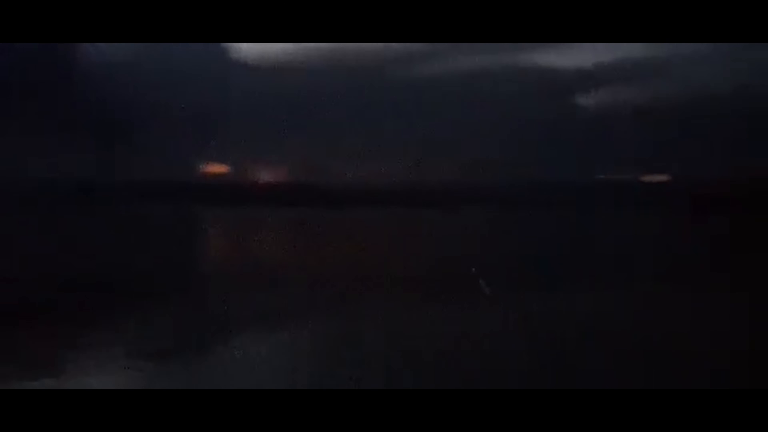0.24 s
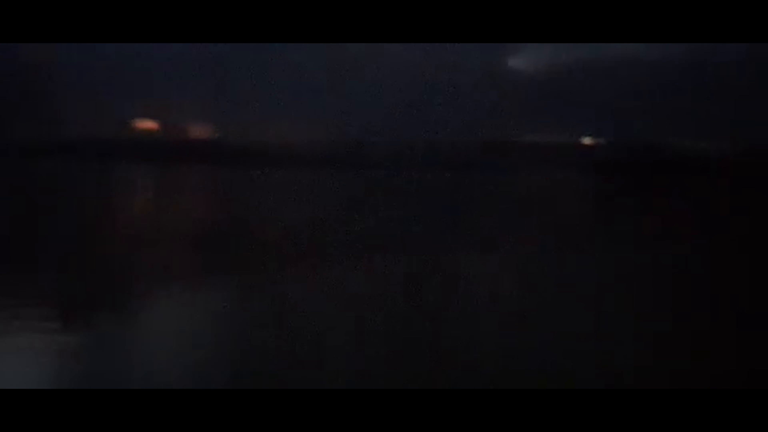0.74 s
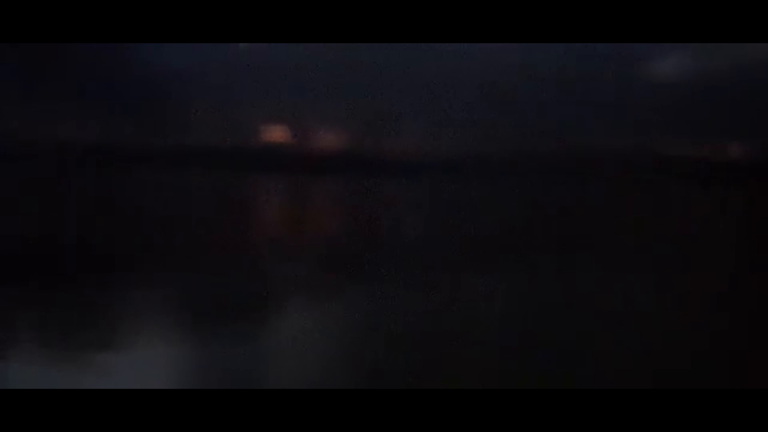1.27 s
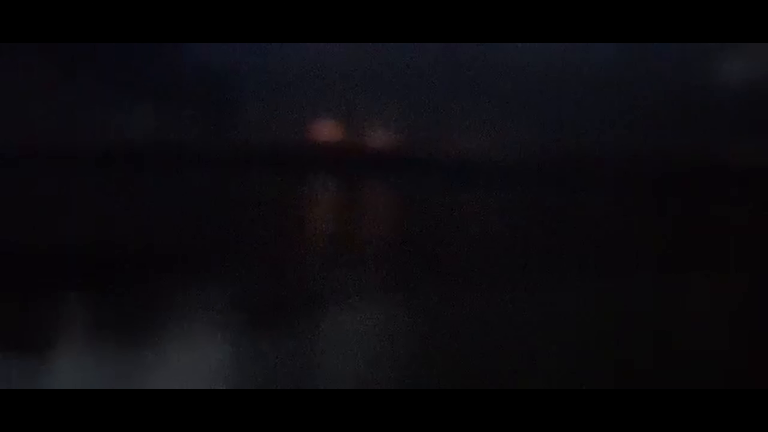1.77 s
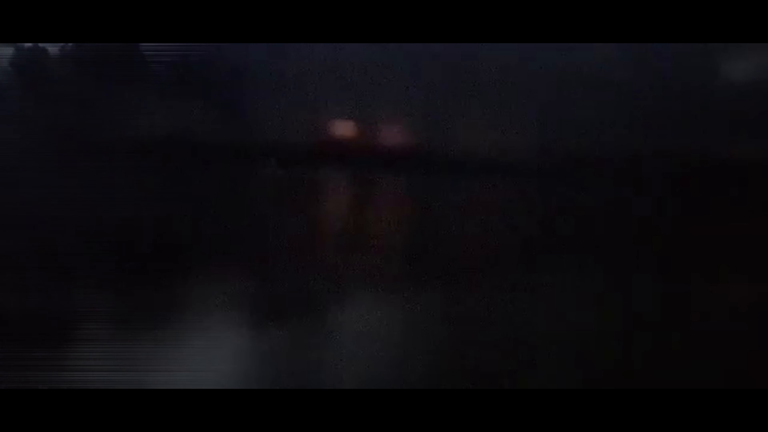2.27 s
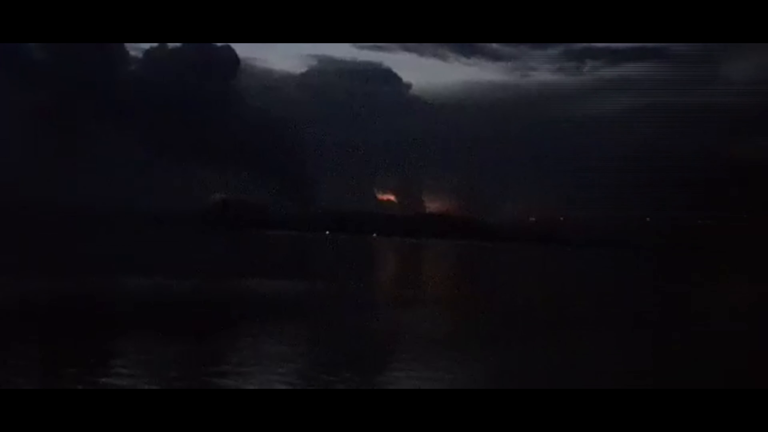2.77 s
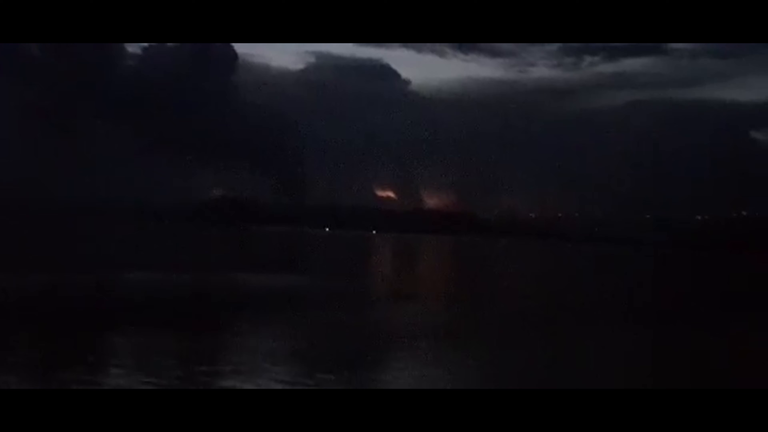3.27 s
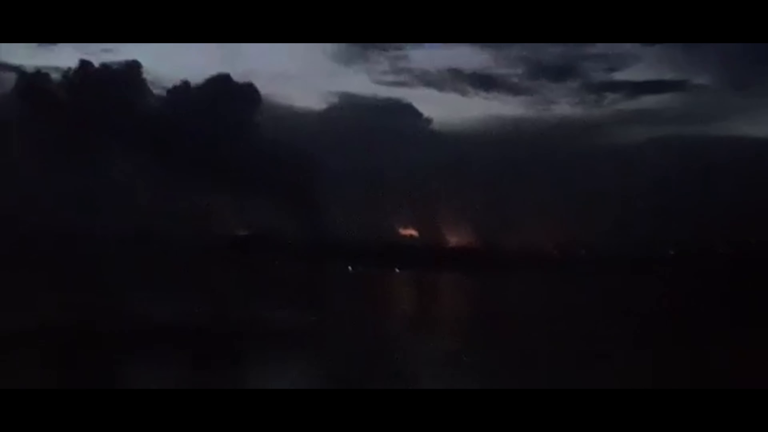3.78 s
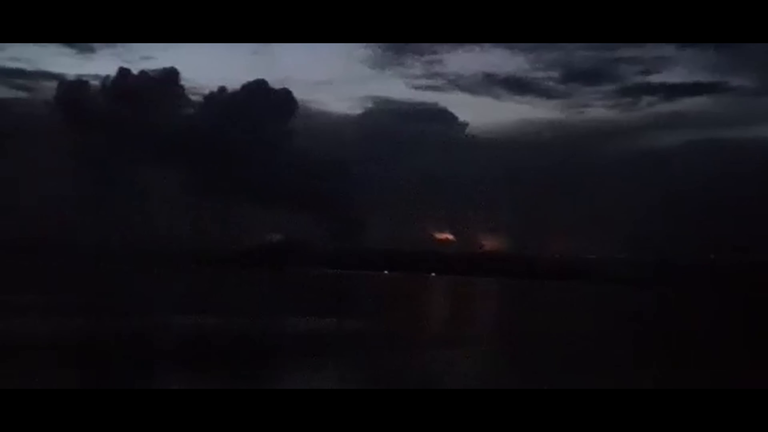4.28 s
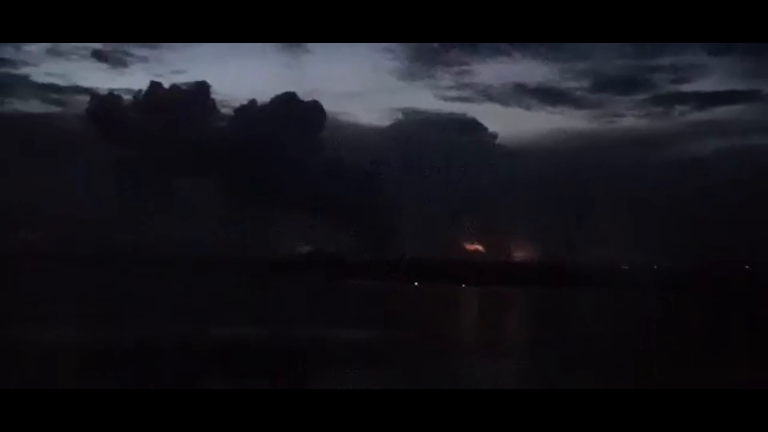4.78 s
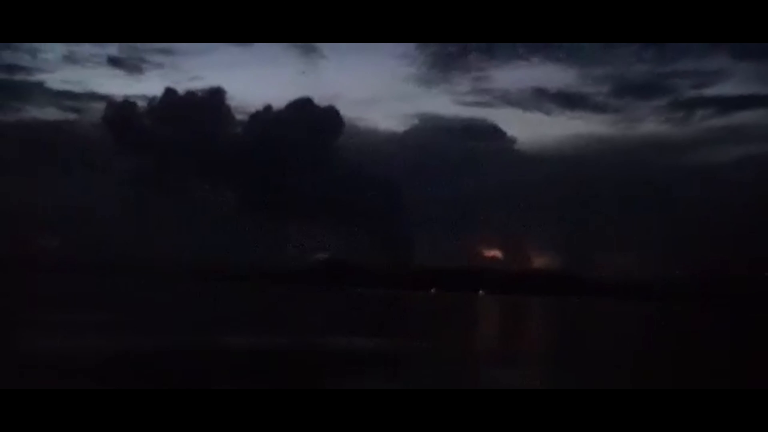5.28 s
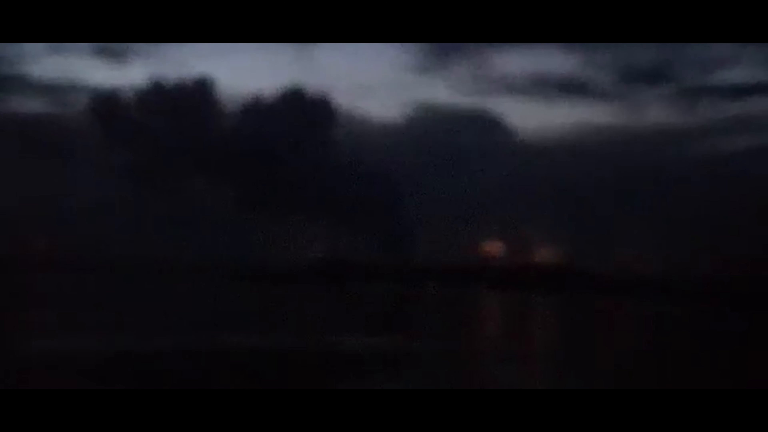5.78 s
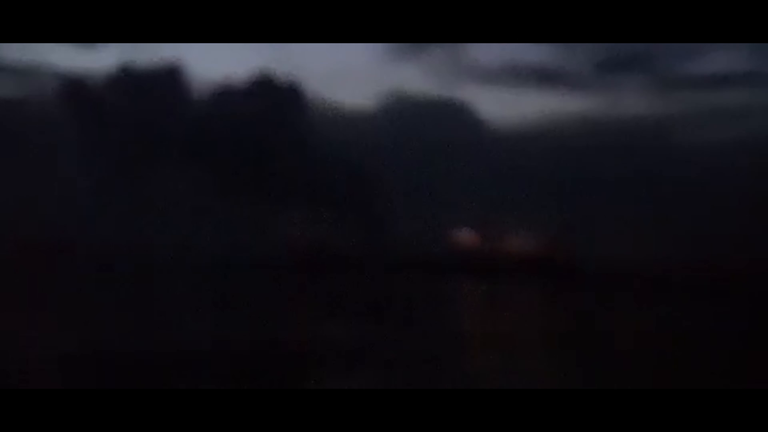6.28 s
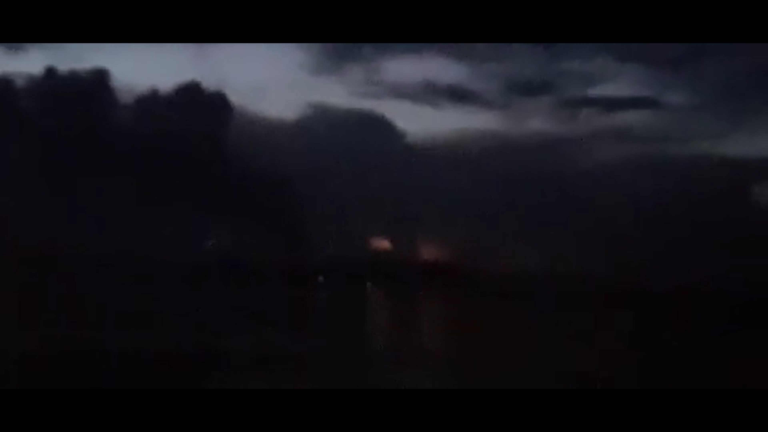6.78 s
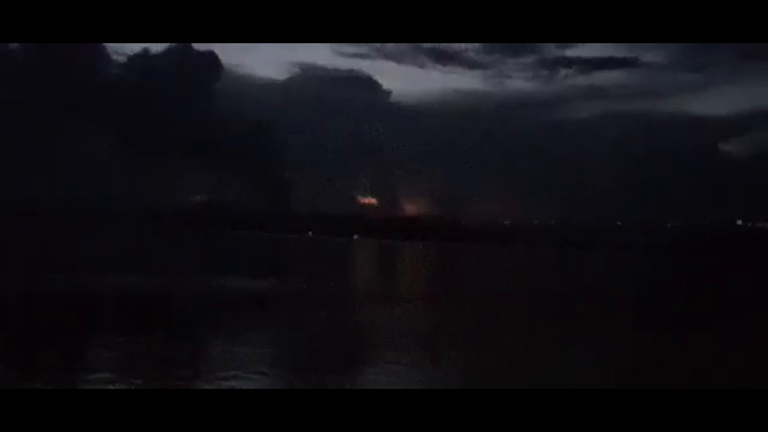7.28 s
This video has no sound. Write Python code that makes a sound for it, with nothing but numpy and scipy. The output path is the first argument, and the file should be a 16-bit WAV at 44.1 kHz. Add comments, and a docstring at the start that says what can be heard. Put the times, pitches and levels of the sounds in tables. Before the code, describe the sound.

A cricket chirps quick falling triplets at right on a night shore; a hollow knock, a brief sound dropout, then a loud nearby unbroken trill.

```python
"""Night at the edge of a lake: shore rumble, a murmur over the water with a distant boat, a far chorus. A
cricket to the right chirps falling triplets from the start. Cloth rustles, then something hollow knocks and
rattles with a faint scrape; small ticks and far frogs follow, made of short noise bands. At two seconds a noise
burst overloads the right channel, the sound drops out for a moment and comes back with a click. After three
seconds a nearer cricket starts a loud unbroken trill of scraped wing strokes, with hoarse swells around the
chirps."""
import sys
import numpy as np
from scipy import signal
from scipy.fft import rfft, irfft, next_fast_len
from scipy.io import wavfile
from scipy.ndimage import uniform_filter1d

SR = 44100
rng = np.random.default_rng(int(sys.argv[2]) if len(sys.argv) > 2 else 0)


def log_audio(samples):
    """Write samples as a 16-bit WAV file to the path given in sys.argv[1]."""
    # one column per channel
    frames = np.atleast_2d(samples).T
    # limit to full scale, then quantise
    limited = np.clip(frames, -1, 1)
    pcm = np.round(limited * 32767).astype(np.int16)
    wavfile.write(sys.argv[1], SR, pcm)


N = 332073


def amp(db):
    """Amplitude factor for a level in dB."""
    return 10 ** (np.asarray(db) / 20)


def unit(x):
    """Scales a signal to an RMS of one."""
    return x / np.sqrt(np.mean(x ** 2) + 1e-20)


def curves(rows):
    """The columns of a table after its time column, joined by lines at every sample."""
    s, *columns = np.transpose(rows)
    return [np.interp(np.arange(N) / SR, s, column) for column in columns]


def pan(left_db):
    """Two channel gains of constant power; negative places the sound to the right."""
    gains = amp(np.array([[.5], [-.5]]) * left_db)
    return gains / np.sqrt((gains ** 2).mean(0))


def add(mix, s, sound):
    """Lays a sound into the mix at s seconds."""
    part = mix[:, max(round(s * SR), 0):][:, :sound.shape[-1]]
    part += sound[..., :part.shape[1]]


def noise(spectrum, same=0):
    """Stereo noise of a given spectrum, silent above its last point; same = likeness of the channels."""
    hz, db = np.transpose(spectrum)
    gain = amp(np.interp(np.log(np.fft.rfftfreq(N, 1 / SR) + 1), np.log(hz), db, right=-np.inf))
    a, b = irfft(rfft(rng.standard_normal((2, N))) * gain, N)
    same = np.clip(same, -1, 1)
    return unit(np.array([a, same * a + np.sqrt(1 - same ** 2) * b]))


def band(centre_hz, width_hz, order=2):
    """Stereo noise in one band; a higher order gives steeper sides."""
    off = (np.fft.rfftfreq(N, 1 / SR) - centre_hz) / (width_hz / 2)
    return unit(irfft(rfft(rng.standard_normal((2, N))) / (1 + abs(off) ** order), N))


def drift(hz):
    """Two random curves that wander mostly slower than hz."""
    return band(0, 2 * hz, order=4)


def patchy(x, depth_db, patch_hz, patch_s):
    """Lets a sound swell and sink in small patches of pitch and time."""
    z = signal.stft(x, nperseg=512, noverlap=384)[2]
    field = rng.standard_normal(z.shape[:0:-1]).T
    for axis, span in [(0, patch_hz * 512 / SR), (1, patch_s * SR / 128)] * 2:
        field = uniform_filter1d(field, max(round(span), 1), axis)
    gain = unit(amp(depth_db * np.minimum(unit(field), 2)))
    return signal.istft(z * gain, nperseg=512, noverlap=384)[1][:, :N]


def swells(rows, width_hz, ragged_db):
    """Soft hoarse swells of band noise, one a row."""
    out = np.zeros((2, N))
    for s, length, hz, db in rows:
        swell = np.hanning(int(length * SR))
        add(out, s, amp(db) * swell * band(hz, width_hz, order=3)[:, :len(swell)])
    return out * amp(ragged_db * drift(86)[0])


# spectrum of the low air and far hum of the shore: [f/Hz, relative level/dB]
RUMBLE_SPECTRUM = [(20, -31.5), (40, -7.5), (60, -0.5), (90, 6.5), (120, 3), (170, -5.5), (300, -11),
                   (500, -44.5), (1000, -33.5)]
# course of the low rumble: [t/s, level/dB]
RUMBLE_COURSE = [(0, -49), (.8, -53), (1.9, -55.5), (3.6, -51), (7.5, -51.5)]


def rumble(lump_db=1.0):
    """Low air along the shore, nearly alike at both microphones: lumpy low noise."""
    level_db = curves(RUMBLE_COURSE)[0] + lump_db * drift(8.0)[0]
    return amp(level_db) * noise(RUMBLE_SPECTRUM, same=0.84) * pan(-1.5)


# colour of the murmur across the water, and of the engine within it: [f/Hz, relative level/dB]
MURMUR_SPECTRUM = [(100, -15.5), (220, -14), (310, 2), (390, -4.5), (440, -1), (500, -12), (570, -10.5),
                   (800, -20.5), (1250, -35.5), (1600, -32), (2100, -32.5), (2700, -32.5), (4000, -35.5),
                   (6000, -46.5)]


def engine(firing_hz=37, waver_turns=0.023):
    """A far boat engine: overtones of its firing beat, coloured like the rest of the murmur."""
    turns = firing_hz * np.arange(N) / SR + waver_turns * drift(1.0)[0]
    hz, db = np.transpose(MURMUR_SPECTRUM)
    orders = np.arange(6, 19)
    gains = amp(np.interp(np.log(orders * firing_hz), np.log(hz), db))
    return unit(sum(g * np.cos(2 * np.pi * (k * turns + rng.random())) for k, g in zip(orders, gains)))


# course of the murmur across the water: [t/s, level/dB]
MURMUR_COURSE = [(0, -66), (1.9, -70.5), (2.3, -58), (5.5, -56), (7.5, -54.5)]


def murmur(throb_hz=23.0, throb_db=4.0, engine_db=-9.5):
    """Far boats across the water: patchy noise that throbs, with one engine's steady overtones."""
    throb_phase = 2 * np.pi * throb_hz * np.arange(N) / SR + drift(2.4)[0]
    throb = amp(throb_db * np.sin(throb_phase) - 2.3)
    patchy_noise = patchy(noise(MURMUR_SPECTRUM, same=0.14), depth_db=3, patch_hz=400, patch_s=.1)
    level_db = curves(MURMUR_COURSE)[0] + 1.0 * drift(14)[0]
    return amp(level_db) * (throb * patchy_noise + amp(engine_db) * engine()) * pan(-0.67)


# spectrum of the faint hiss: [f/Hz, relative level/dB]
HISS_SPECTRUM = [(1000, 5.5), (2800, 0), (6500, -2), (8500, -0.5), (11000, 3), (12900, -4.5), (13400, -31)]


def hiss(level_db=-70.5):
    """A trace of broad hiss that swells and sinks in patches."""
    return patchy(amp(level_db) * noise(HISS_SPECTRUM), depth_db=5, patch_hz=350, patch_s=.1)


# far choirs of frogs and insects: [low edge f/Hz, high edge f/Hz, level/dB, left-right/dB, slow swell/dB]
FAR_CHOIRS = [(1250, 2700, -83, 0, -4.5), (1850, 2250, -81, -2, 3), (4496, 5365, -53, -5.5, 0),
              (7110, 7600, -70.5, -2.5, 2.5), (9750, 11100, -74, -12.5, 2)]


def chorus(throb_db=1.8, whistle_db=-72):
    """Countless far callers merge into throbbing noise bands; a thin high one stands out now and then."""
    out = np.zeros((2, N))
    for low_hz, high_hz, db, left_db, swell_db in FAR_CHOIRS:
        level_db = db + throb_db * drift(21)[0] + swell_db * drift(2.8)[0]
        callers = band((low_hz + high_hz) / 2, high_hz - low_hz, order=6)
        out += amp(level_db) * pan(left_db) * callers
    out = patchy(out, depth_db=2.0, patch_hz=200, patch_s=.08)
    bouts = np.maximum(drift(11.0)[0] - .5, 0)
    return out + amp(whistle_db) * bouts * band(7460, 70)


def bank(x, wet_db, t60):
    """Grass and shore scatter a short tail, different at each microphone."""
    t = np.arange(SR // 4) / SR
    tail = rng.standard_normal((2, len(t))) * amp(-60 * t / t60) * (t > .003)
    return x + amp(wet_db) * signal.fftconvolve(x, unit(tail) / np.sqrt(len(t)), axes=1)[:, :N]


# triplet chirps, about four a second with a stumble now and then: [t/s, level/dB, roughness/0-1]
TRIPLETS = [(0.04, -34.5, 0.13), (.278, -42, 0.07), (.626, -42, 0.11), (.868, -38.5, 0.08),
            (1.111, -37.5, 0.05), (1.350, -36.5, 0.07), (1.556, -36.5, 0.08), (1.797, -35, 0.03),
            (2.331, -32, 0.02), (2.570, -33.5, 0.05), (2.809, -34, 0.22), (3.049, -36, 0.08),
            (3.2913, -37, 0.6), (3.531, -35, 0.46), (3.7711, -39.5, 0.6), (4.013, -38.5, 0.84),
            (4.25, -37, 1), (4.4912, -33, 0.5), (4.7315, -34, 0.35), (4.935, -37.5, .75),
            (5.175, -33.5, 0.34), (5.444, -35, 0.3), (5.683, -38, 0.9), (5.9242, -33, 0),
            (6.1624, -36.5, 0.4), (6.4044, -37, 0.3), (6.69, -35.5, 0.3), (6.956, -33.5, 0.5),
            (7.1951, -34.5, 0.4), (7.4352, -37.5, 0.37)]


def chirps(start_hz=5590, blur_hz=330, left_db=-15, smear_hz=5230, smear_width_hz=850, smear_db=-5):
    """Three wing strokes a chirp, sliding down in pitch; rough ones break up and smear into a noisy band."""
    fall_hz, pulse_s, spacing_s, smear_s = 1100, .0205, .0324, .05
    out, smear, t = np.zeros((2, N)), np.zeros((2, N)), np.arange(0, pulse_s, 1 / SR)
    u = t / pulse_s
    arch = np.sin(np.pi * u) ** 2
    shape = arch / (.3 + .7 * arch)
    grit = (drift(blur_hz)[0] + 1j * drift(blur_hz)[0]) / np.sqrt(2)
    smear_swell = np.hanning(round(smear_s * SR))
    for s, db, rough in TRIPLETS:
        rough = np.clip(rough, 0, 1)
        for k, (detune, loud, late) in enumerate(rng.standard_normal((3, 3))):
            at = s + k * spacing_s + 0.0003 * late
            phase = 2 * np.pi * np.cumsum(start_hz + 28 * detune - fall_hz * u) / SR
            stroke_grit = grit.take(round(at * SR) + np.arange(len(t)), mode="clip")
            grip = np.sqrt(1 - rough) + np.sqrt(rough) * stroke_grit
            add(out, at, amp(db + .6 * loud) * shape * (grip * np.exp(1j * phase)).imag)
            # the smear is centred on its stroke
            add(smear, at + (pulse_s - smear_s) / 2, rough * amp(db + smear_db) * smear_swell)
    smeared = smear * pan(-9) * band(smear_hz, smear_width_hz, order=6)
    return bank(out * pan(left_db), wet_db=-10, t60=0.18) + smeared


def brush(start, length, db, rise_s=0.056, fall_s=0.15):
    """The pressure of one brush or scrape: it rises, holds and lets go."""
    age = np.arange(N) / SR - start
    press = np.clip(np.minimum(age / rise_s, (length - age) / fall_s), 0, 1)
    return amp(db) * np.sin(np.pi / 2 * press) ** 2


# a brush of cloth, then a faint scrape that goes with the knock: [t/s, length/s, level/dB]
BRUSHES = [(0.047, 0.29, -44), (0.34, 0.29, -64)]
# spectrum of the cloth: [f/Hz, relative level/dB]
CLOTH_SPECTRUM = [(500, -12), (1200, -9), (1800, 3.5), (2400, 7), (3200, 1.5), (4500, -1), (6200, -5),
                  (7300, -5), (8200, -28), (10500, -12), (12800, -19), (13500, -64)]


def rustle():
    """Cloth somewhat to the right, then a faint scrape with the knock: coloured noise follows the pressure of
    each."""
    pressure = sum(brush(*row) for row in BRUSHES)
    return pressure * noise(CLOTH_SPECTRUM, same=0.45) * amp(0.7 * drift(90)[0]) * pan(-5.0)


# a hollow knock and its softer rattles: [t/s, level/dB, time the blow takes/s, pitch factor]
BLOWS = [(0.3855, -13, 0.0032, 0.98), (0.418, -30.5, 0.001, 0.87), (0.4381, -28, 0.0033, 1),
         (0.4521, -24, 0.007, 0.97), (0.4607, -39, 0.0051, 0.9)]
# ringing modes of the hollow thing, before the pitch factor: [f/Hz, relative level/dB, t60/s]
HOLLOW_MODES = [(125.4, -17, 0.29), (237, -7, 0.066), (353, -2.5, 0.034), (407, 1, 0.096),
                (554, -12, 0.086), (816, -30.5, 0.14)]
# spectrum of the dull scuff of each blow: [f/Hz, relative level/dB]
SCUFF_SPECTRUM = [(60, -19), (130, -2), (300, 1), (550, -7.5), (750, -19.5), (1200, -24)]


def knock(scuff_db=-16, scuff_t60=0.11):
    """Something hollow is knocked and rattles back: decaying modes and a dull scuff under a soft onset."""
    out, t = np.zeros((2, N)), np.arange(SR // 3) / SR
    scuff = noise(SCUFF_SPECTRUM, same=0.77)
    for s, db, blow_s, pitch in BLOWS:
        ring = sum(amp(mode_db - 60 * t / t60) * np.sin(2 * np.pi * hz * pitch * t)
                   for hz, mode_db, t60 in HOLLOW_MODES)
        ring = ring + amp(scuff_db - 60 * t / scuff_t60) * scuff[:, round(s * SR):][:, :len(t)]
        soft_blow = 1 - np.exp(-(t / blow_s) ** 2)
        add(out, s, amp(db) * pan(-1.7) * ring * soft_blow)
    return out


# small ticks, and the click as the sound comes back at 2.177 s: [t/s, level/dB, centre f/Hz]
TICKS_AND_CLICK = [(0.388, -58, 2400), (0.417, -50, 2130), (1.806, -58, 2240), (2.177, -57, 5020),
                   (2.575, -64, 6000), (4.775, -62, 1480), (5.884, -58, 1500)]


def ticks_and_click(t60=0.073):
    """Small ticks, and the click as the sound comes back: bursts of wide band noise that die away."""
    out, t = np.zeros((2, N)), np.arange(SR // 3) / SR
    for s, db, hz in TICKS_AND_CLICK:
        add(out, s, amp(db - 60 * t / t60) * pan(-2) * band(hz, hz, order=3)[:, :len(t)])
    return out


# far frogs: [t/s, length/s, f/Hz, level/dB]
FROG_CALLS = [(0.88, 0.1, 1940, -73), (1.503, 0.089, 1520, -63), (2.25, 0.17, 1740, -63),
              (2.58, 0.21, 2140, -72), (2.81, 0.1, 1570, -62.5), (3.31, 0.15, 1700, -62),
              (4.16, 0.093, 1910, -70), (4.9, 0.25, 1870, -64), (5.12, 0.17, 2050, -72),
              (5.836, 0.11, 2330, -61.5), (6.02, 0.11, 2040, -67), (6.384, 0.16, 2230, -62),
              (6.6, 0.18, 1920, -63), (6.95, 0.35, 2120, -59), (7.39, 0.15, 2100, -61.5)]


def frogs():
    """Frogs far off: distance blurs each call into a hoarse swell of noise, broken into patches."""
    calls = swells(FROG_CALLS, width_hz=850, ragged_db=2.5)
    return patchy(calls, depth_db=4.5, patch_hz=250, patch_s=.03)


def glitch(x, shriek_hz=5200, crackle_db=-20, tail_db=-33, pop_db=0, fizz_db=-41):
    """A shrill burst overloads the right channel and ends in a pop; both channels then go mute briefly."""
    start, stop, pop, mute, resume = 2.0416, 2.0573, 2.0588, 2.060, 2.177  # t/s
    drive_db, width_hz = 10, 1050
    t = np.arange(N) / SR
    shriek = band(shriek_hz, width_hz, order=3)[0] + amp(-19) * band(8000, 2000)[0]
    burst = amp(drive_db) * shriek * ((t > start) & (t < stop))
    crackle = amp(crackle_db) * ((t > start - .0025) & (t < pop))
    crackle = crackle + amp(pop_db) * np.exp(-((t - pop) / 0.00019) ** 2)
    crackle = crackle * band(7300, 13000)[0]
    tail = amp(tail_db) * band(2900, 1900)[0] + amp(fizz_db) * band(7000, 9000)[0]
    tail = tail * (t > mute) * amp(2.4 * drift(300)[0] - 60 * abs(t - mute) / 0.047)
    right = np.clip(np.clip(burst, -1, 1) + crackle + tail, -1, 1)
    left = amp(-38.5) * crackle
    return x * np.where((t > mute) & (t < resume), amp(-44.5), 1) + np.array([left, right])


def above(x, edge_hz):
    """A steep high-pass, run both ways so that it adds no delay."""
    return signal.sosfiltfilt(signal.butter(16, edge_hz, "high", fs=SR, output="sos"), x)


# ground and stems return each stroke a moment later: [delay t/s, level/dB]
GROUND_ECHOES = [(.003, -22), (.005, -20.5), (.0075, -24), (.011, -28), (.016, -34)]


def ground(x, sways_per_s=6):
    """Early reflections that come and go as the grass sways, differently at each microphone."""
    z = signal.hilbert(x, next_fast_len(N))[:, :N]
    at = np.arange(N) / SR * sways_per_s
    step, part = at.astype(int), at % 1 * np.pi / 2
    fading, rising, out = np.cos(part), np.sin(part), x
    for delay_s, db in GROUND_ECHOES:
        # random complex gains, crossfaded from one to the next
        sway = (rng.standard_normal((2, step[-1] + 2, 2)) @ [1, 1j]) / np.sqrt(2)
        swaying = sway[:, step] * fading + sway[:, step + 1] * rising
        out = out + amp(db) * (np.roll(z, round(delay_s * SR), axis=1) * swaying).real
    return out


# the trill's course: [t/s, level/dB, left-right/dB, scratch level/dB, lag of the left microphone t/s]
TRILL_COURSE = [(3.12, -30.5, -2, 1, 0.00048), (3.38, -27.5, -1.5, 4, 0.00047),
                (3.55, -29, -0.5, -0.5, .000457), (3.9, -28.5, 0, 3, .000455), (4.2, -26, -0.5, 2, 0.00047),
                (4.55, -27.5, -3.5, 2.5, 0.00047), (5.2, -26.5, -4, 4, 0.00049),
                (5.7, -26.5, -3.5, 3.5, 0.00049), (6.25, -26.5, -3.5, 3.5, 0.00049),
                (6.78, -25.5, -2.5, -0.5, 0.00047), (7.15, -27, -5, 0.5, 0.00048),
                (7.53, -27.3, -4, 0, 0.00047)]
# spectrum of the scraper's rasp: [f/Hz, relative level/dB]
RASP_SPECTRUM = [(1000, -11.5), (2600, -37), (3300, -7), (3700, 1), (4200, -11), (4750, 27), (5200, 14),
                 (5800, 5.5), (6400, 2.5), (6900, -7.5), (7450, 4.5), (8550, -8.5), (8850, 16.5),
                 (10200, 1.5), (11500, 1.5), (12500, 2.5), (12900, 6.5), (13350, -7.5), (14600, -40)]
# one tentative stroke, then a beat that slowly tires
FIRST_STROKE_S, TRILL_START_S = 3.0868, 3.1189
STROKES_PER_S, SLOWING_PER_S2 = 61.67, .1304
# the file's octave gains level as the trill goes on
OCTAVE_DB, OCTAVE_RISE_DB_PER_S, OCTAVE_WANDER_DB, OCTAVE_LEFT_DB = -50.5, 1, 1.5, 8
SCRAPE_DB, FORCE_SPREAD_DB = -45.5, .65
# the reeds smear the low skirt of the trill into an even haze, its level relative to the trill
HAZE_HZ, HAZE_WIDTH_HZ, HAZE_DB = 3746, 470, -36.5


def trill(pitch_hz=4425, stroke_s=0.011, shake=0.2, detune_hz=14, scatter_db=-7, release=0.3):
    """Each wing stroke drags a scraper over a file, ever less often: a falling tone, its octave and a rasp."""
    fall_hz, ramp, fade, slip_rad, jitter_s, wander_s = 420, .37, .25, .15, .00001, .000012
    t = np.arange(N) / SR
    singing = t > TRILL_START_S
    level_db, left_db, scratch_db, left_lag_s = curves(TRILL_COURSE)
    sung_s = np.maximum(t - TRILL_START_S, 0)
    turns = STROKES_PER_S * sung_s - SLOWING_PER_S2 * sung_s ** 2 / 2
    beats = np.interp(np.arange(1, int(turns[-1]) + 1), turns, t)
    starts = np.r_[FIRST_STROKE_S, TRILL_START_S, beats]
    # no two strokes match in timing, force, length, pitch or scratchiness
    wander, early, loud, long, sharp, scratchy = rng.standard_normal((len(starts), 6)).T
    starts = starts + wander_s * np.cumsum(wander) + jitter_s * early
    which = np.maximum(np.searchsorted(starts, t) - 1, 0)
    # the right microphone hears it first
    age = t - starts[which] - np.array([[1], [0]]) * left_lag_s
    u = np.clip(age / (stroke_s * (1 + 0.055 * long[which])), 0, 1)
    force = amp(FORCE_SPREAD_DB * loud[which] - 5.9 * (which == 0))  # the first stroke is tentative
    press = np.minimum(np.minimum(u, 1 - u) / ramp, 1)
    contact = force * (1 - fade * u) * np.sin(np.pi / 2 * press) ** 2
    contact = contact / np.sqrt(np.mean(contact[:, singing] ** 2))
    # the teeth catch unevenly, so loudness and phase shake within a stroke
    phase = 2 * np.pi * age * (pitch_hz + fall_hz * (1 - u) / 2) + slip_rad * drift(190)[0]
    phase = phase + 2 * np.pi * detune_hz * sharp[which] * (age - stroke_s / 2)
    grip = 1 + shake * drift(240)[0] + 0.054 * drift(320)
    # steep lower edges for the tone and its octave
    tone = above(contact * grip * np.sin(phase), 4040)
    tone = tone / np.sqrt(np.mean(tone[:, singing] ** 2))
    octave = above(contact * (1 - u) * np.sin(2 * phase), 8720)
    octave_db = OCTAVE_DB + scratch_db + OCTAVE_RISE_DB_PER_S * sung_s + OCTAVE_WANDER_DB * drift(0.99)
    octave = octave * pan(OCTAVE_LEFT_DB) * amp(octave_db)
    # the stems scatter the high scratch into the gaps between strokes
    scattered = abs(uniform_filter1d(contact ** 2, round(SR / STROKES_PER_S)))
    # the scraper snags as it lifts off
    letting_go = release * force * singing * np.exp(-((u - .8) / 0.05) ** 2)
    scratch = np.sqrt((contact + letting_go) ** 2 + amp(scatter_db) ** 2 * scattered)
    rasp_db = SCRAPE_DB + scratch_db + 1.0 * scratchy[which] + 0.46 * drift(500)[0]
    rasp = scratch * amp(rasp_db) * noise(RASP_SPECTRUM)
    rasp = patchy(rasp, depth_db=2.5, patch_hz=450, patch_s=.06)
    haze = amp(level_db + HAZE_DB) * np.sqrt(scattered) * band(HAZE_HZ, HAZE_WIDTH_HZ, order=6)
    return ground(amp(level_db) * pan(left_db) * tone + octave) + rasp + haze


# hoarse swells around the chirps: [t/s, length/s, f/Hz, level/dB]
HOARSE_SWELLS = [(3.26, 0.076, 5370, -42.5), (3.96, 0.18, 5800, -56), (4.76, 0.22, 6300, -58),
                 (5.6, 0.26, 6000, -53), (6.27, 0.38, 5900, -55)]


def hoarse_swells():
    """Hoarse swells of band noise around the chirps, to the right."""
    return pan(-8) * swells(HOARSE_SWELLS, width_hz=1000, ragged_db=4)


def scene():
    """Night air and far callers, the chirping cricket, small sounds, frogs, the trill and hoarse swells."""
    air = rumble() + murmur() + hiss()
    small_sounds = rustle() + knock() + ticks_and_click()
    return air + chorus() + chirps() + small_sounds + frogs() + trill() + hoarse_swells()


def record(dry):
    """The glitch, then a steep low-pass."""
    top_hz = 16260
    low_pass = signal.firwin(255, top_hz, window=("kaiser", 8), fs=SR)
    return signal.oaconvolve(glitch(dry), low_pass[None], "same")


dry = scene()
out = record(dry)
log_audio(out)
```